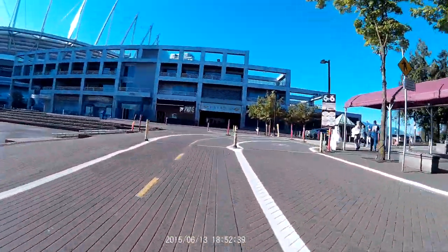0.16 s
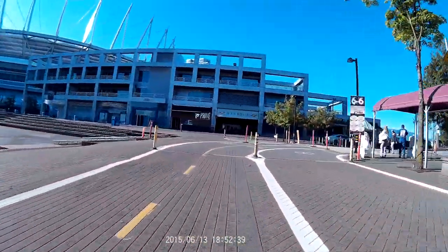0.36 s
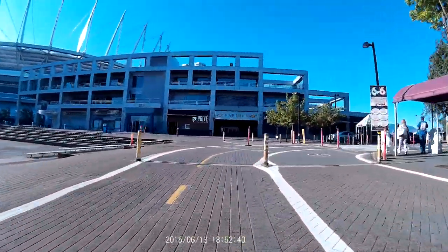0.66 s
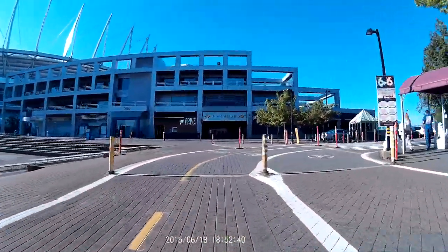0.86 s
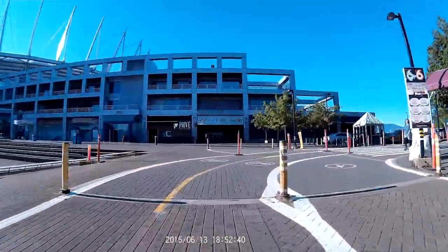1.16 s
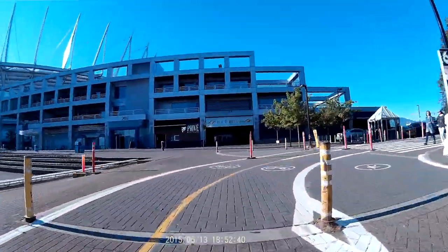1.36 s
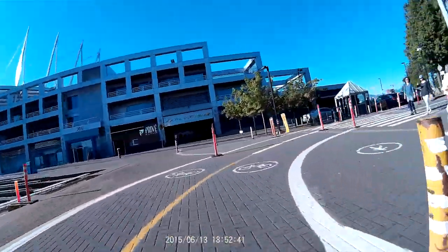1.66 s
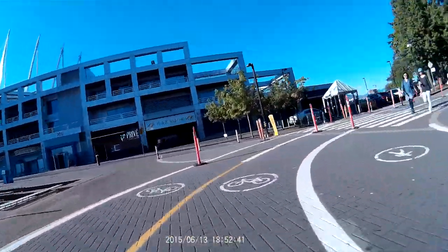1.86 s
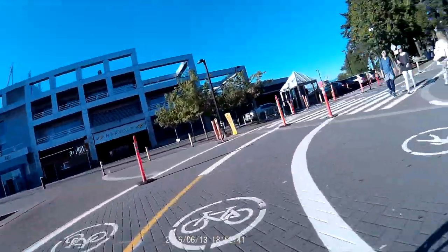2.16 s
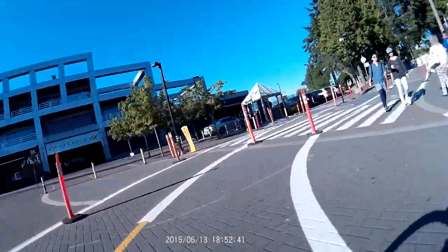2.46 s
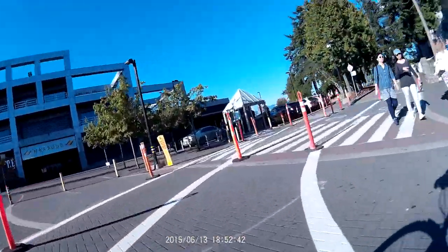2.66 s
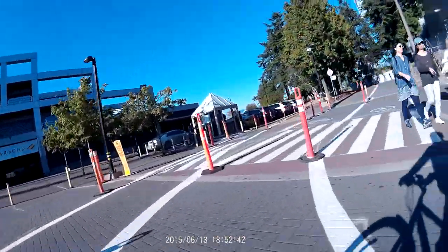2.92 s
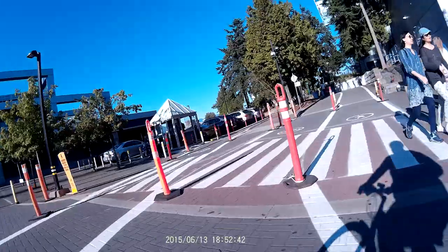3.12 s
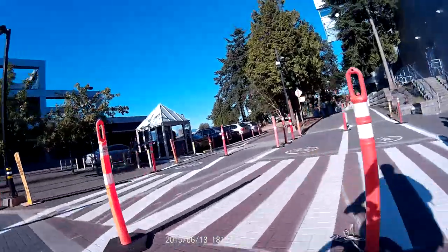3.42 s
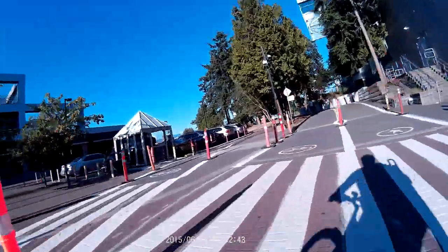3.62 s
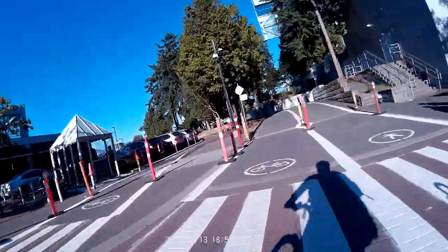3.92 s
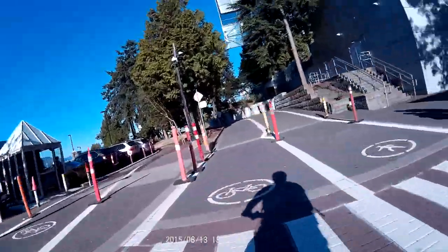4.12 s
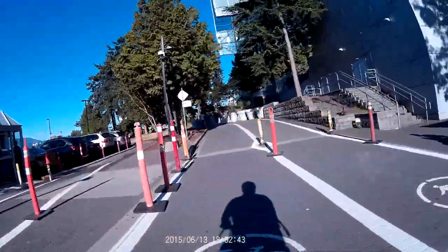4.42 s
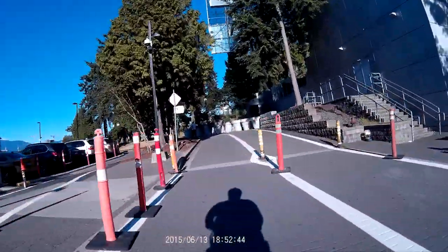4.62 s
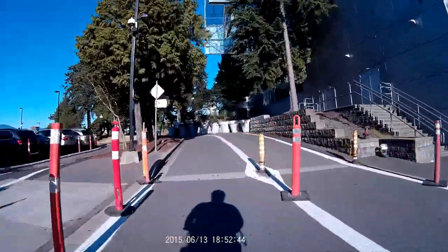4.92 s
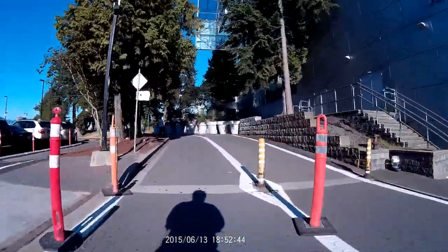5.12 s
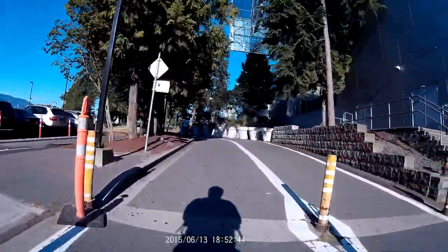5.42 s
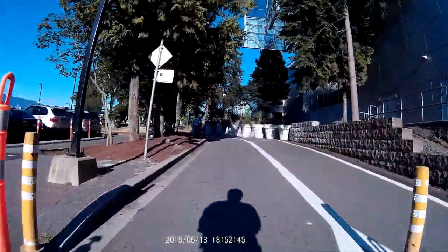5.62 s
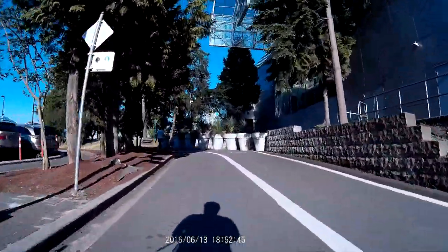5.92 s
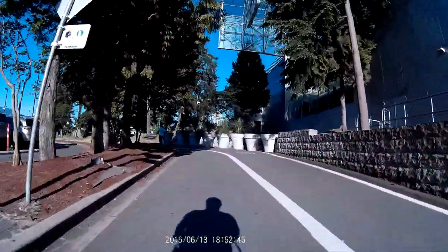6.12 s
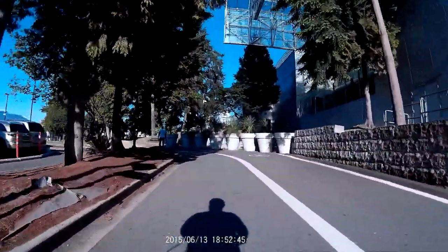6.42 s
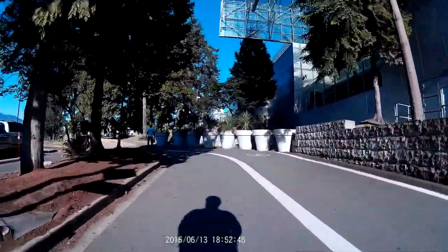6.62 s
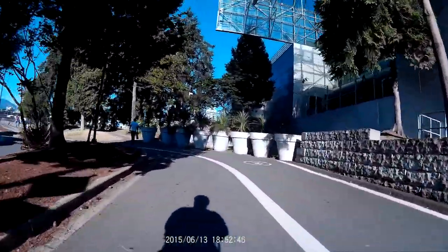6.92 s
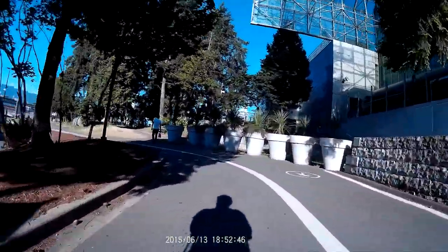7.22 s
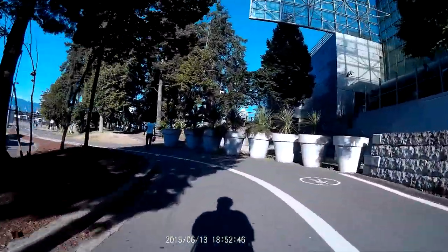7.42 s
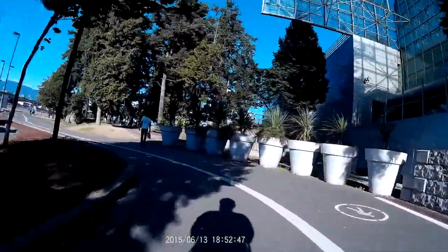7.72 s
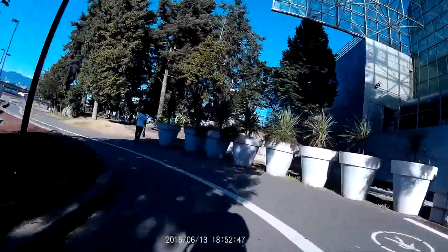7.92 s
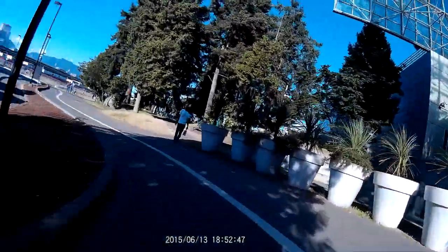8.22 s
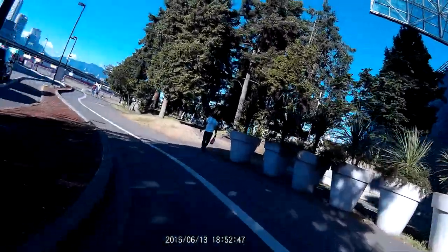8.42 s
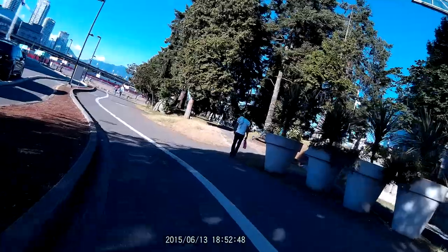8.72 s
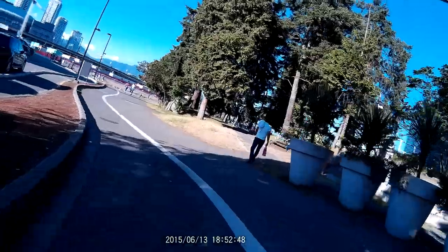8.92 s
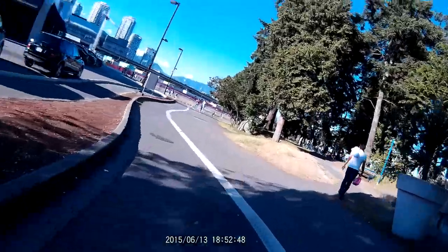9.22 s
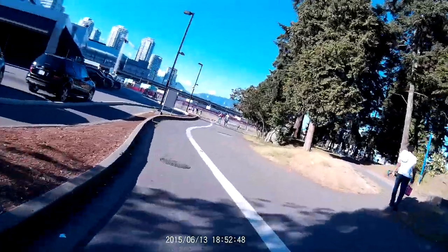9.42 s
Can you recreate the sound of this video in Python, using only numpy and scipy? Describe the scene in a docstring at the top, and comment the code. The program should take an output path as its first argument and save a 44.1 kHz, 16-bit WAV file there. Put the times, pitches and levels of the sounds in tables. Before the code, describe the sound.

A bicycle rolls over brick paving with a low buzzing hum and hard plastic rattles, then smooths out onto gritty asphalt.

```python
"""A bicycle ride, heard by a microphone in a loose plastic case on the handlebar.
From the start it rolls over brick pavers: shaped noise makes mount hum, tyre roar and rumble, louder on rough stretches.
Up to about 6 s, joints thud through the fork and the case chatters and knocks on its mount in decaying modes.
Smooth asphalt from 6.7 s brings less chatter, with grit, sandy patches and a few taps; a last jolt and knock come near 9.5 s.
Gain control ducks the sound after sharp knocks; the highest peaks clip."""
import sys
import numpy as np
from scipy import signal
from scipy.fft import rfft, irfft
from scipy.io import wavfile
from scipy.ndimage import uniform_filter1d

SR = 44100
rng = np.random.default_rng(int(sys.argv[2]) if len(sys.argv) > 2 else 0)


def inscribe(sig):
    """Save sig as 16-bit PCM at rate SR to the path in sys.argv[1].

    A 1-D sig is mono; a 2-D sig holds one channel per row.
    Samples are clipped to [-1, 1] before scaling.
    """
    pcm = np.round(np.clip(np.atleast_2d(sig).T, -1, 1) * 32767)
    wavfile.write(sys.argv[1], SR, pcm.astype(np.int16))


N = 422037
TIME_S = np.arange(N) / SR

# All table levels are relative: each source adds its own trim.
# ride apart from bumps: (time [s], mount hum [dB], tyre roar [dB], rumble [dB])
RIDE_LEVELS = [(0, -26.5, -47, -37.5), (.3, -18, -40, -30.5), (.8, -14.5, -36, -30),
               (1.15, -20, -41.5, -31.5), (1.35, -16.5, -36, -30.5), (2.3, -20, -40, -33),
               (2.9, -17.5, -36.5, -25), (3.2, -19.5, -35, -27), (4, -17, -38.5, -28),
               (4.7, -19, -39.5, -27), (5.2, -18, -38.5, -31.5), (5.7, -15, -35.5, -24.5),
               (6.25, -23.5, -41, -33), (6.5, -15.5, -36.5, -33), (7.25, -22.5, -34.5, -35.5),
               (7.6, -18, -34, -36), (8.5, -18.5, -37, -34.5), (9.57, -17, -34.5, -32)]
# rough paving: (start [s], length [s], roughness [dB])
ROUGH_STRETCHES = [(.44, 0.21, -7), (.76, 0.11, -12), (.96, 0.076, -3.5), (1.23, 0.049, -13),
                   (1.755, .11, 2), (1.945, 0.071, 11.5), (2.47, 0.044, -2.5), (2.61, 0.16, -10.5),
                   (3.24, 0.11, -2), (3.49, 0.19, 6), (3.95, 0.31, -7.5), (4.35, 0.25, -7),
                   (4.79, 0.028, -4.5), (4.97, 0.19, -22), (5.22, 0.052, -5.5), (5.4, 0.16, 0),
                   (5.81, 0.21, -2), (9.48, 0.012, -12)]
# brief swells and dips of the mount's hum and the rumble: (centre [s], level change [dB])
HUM_SWELLS = [(2.22, 5), (2.5, 4.5), (3.6, 3), (4.82, 2), (6.5, -0.5), (6.76, -3), (7.05, 2.5), (7.6, 4.5),
              (7.88, 2), (8.88, 3), (9.5, -2)]
# sandy patches: (start [s], length [s], level [dB])
SAND_PATCHES = [(4.35, 0.92, -54), (6.76, 0.14, -54), (7.2, 0.17, -59), (7.52, .3, -50), (9.22, 0.095, -45)]
# grit breaking under the tyre: (time [s], level [dB])
GRIT_TIMES = [(1.178, -40.5), (6.278, -50), (6.302, -37.5), (6.771, -38), (6.8578, -47), (7.231, -43),
              (8.0088, -41.5), (9.3338, -44)]
# wheel drops into a joint: (time [s], thud [dB], handlebar lurch [dB])
JOINT_DROPS = [(1.759, -25.5, -17), (1.79, -22, -16), (1.98, -7, 2), (2.631, -16, -7.5), (3.025, -1, 3.5),
               (3.499, -21, -15), (3.615, -12, -7.5), (3.635, -13.5, -5), (3.656, -10, 1),
               (4.036, -24, -14), (4.161, -19.5, -18), (4.461, -16.5, -26), (4.48, -9, 1), (4.521, -15, -8),
               (4.648, -15, -13.5), (5.489, -21, -23), (5.82, -28, -3), (5.918, -9, 0), (5.938, -1.5, 9),
               (6.041, -14, -1.5), (9.496, -29, -7.5)]
# lone light taps of the case: (time [s], level [dB])
LIGHT_TAPS = [(0.3685, -33.5), (0.4541, -20.5), (0.4862, -22.5), (0.5151, -22), (0.5541, -26),
              (2.6212, -21), (2.6877, -23), (3.3371, -21), (3.416, -24), (3.548, -14), (4.1277, -19),
              (3.843, -23.5), (3.957, -24.5), (4.8069, -21), (4.9187, -32), (5.0005, -24), (5.1033, -26),
              (5.2378, -29), (5.5526, -22), (5.869, -20), (6.0219, -18), (7.5765, -31), (8.01, -33)]
# case knocks on the mount: (time [s], knock [dB], mount swing [dB], blows in a row [count])
CASE_KNOCKS = [(0.0527, -22.5, -21, 1), (0.4937, -26.5, -10, 1), (0.837, -7.5, -30, 5),
               (0.871, -18, -10, 1), (1.08, -16, -8, 1), (1.3783, -14, -10, 1), (1.7776, -15.5, -1.5, 1),
               (1.7999, -15, -8, 1), (1.8286, -4.5, -1.5, 1), (1.8564, -2.5, -2.5, 2),
               (1.9625, -13, -16, 1), (1.986, -2, -8, 5), (2.023, -9, -11, 2), (2.1371, -13, -7, 1),
               (2.37, -21, -16, 1), (2.636, -2, -3, 2), (2.7844, -5, -8, 1), (2.8384, -11.5, -3, 1),
               (2.8635, -10.5, -3, 1), (3.0252, -3, 3, 2), (3.0326, 2.5, -4, 8), (3.074, -8, -9, 2),
               (3.2366, -14.5, -5, 1), (3.2507, -20, -25, 1), (3.3468, -18, -16, 1), (3.3522, -12, -6, 1),
               (3.4956, -14.5, -16, 1), (3.523, -5.5, -4, 1), (3.57, -16.5, -16, 1),
               (3.6191, -0.5, -4.5, 3), (3.6435, -4.5, -11, 1), (3.6578, -2.5, 6, 3), (3.723, -9, -6.5, 1),
               (4.0384, -8.5, -4, 3), (4.0652, -21, -25, 2), (4.1698, -7, -6.5, 2), (4.4652, -10, -0.5, 1),
               (4.4837, -4, -14, 4), (4.5214, -1.5, -4, 2), (4.5727, -20, -19, 1), (4.626, -11, -8, 2),
               (4.6525, -7, -10, 3), (5.4894, -9.5, -14, 1), (5.4946, -4, -3, 1), (5.8953, -20.5, -15, 2),
               (5.9086, -6, -22, 2), (5.9236, -7, -13, 1), (5.943, -8, 2, 1), (5.948, -0.5, -9, 5),
               (6.0013, -6.5, -6, 1), (6.0423, -6.5, -13, 3), (6.0792, -6, -5.5, 1), (6.096, -18, -11, 1),
               (9.4985, -18, 0.5, 1)]

# microphone hiss: (frequency [Hz], density [dB per Hz])
HISS_SPECTRUM = [(1000, 10.5), (6000, -4.5), (9000, -2.5), (14500, -2.5), (15400, -14), (16500, -21.5)]
# rumble through the frame: (frequency [Hz], density [dB per Hz])
RUMBLE_SPECTRUM = [(10, -4.5), (27, -4), (45, -4.5), (70, -9.5), (115, -6.5), (160, -17), (230, -13),
                   (400, -34), (1200, -76)]
# tyre roar inside the case: (frequency [Hz], density [dB per Hz])
ROAR_SPECTRUM = [(120, -19.5), (200, 3.5), (430, 12.5), (530, -4), (660, 3.5), (920, 0), (1250, -2),
                 (1450, -4.5), (1800, -9.5), (2200, -12), (3000, -18), (3200, -41), (4200, -32.5),
                 (6500, -39)]
# case resonances colouring the roar: (frequency [Hz], full width at half the dB lift [Hz], lift [dB])
CASE_RESONANCES = [(1093.5, 140, 11.5), (1671, 140, 10.5), (2847, 120, 10.5), (3516, 370, 19.5),
                   (5300, 100, 8.5), (7700, 410, 6.5)]
# mount resonances: (frequency [Hz], half width [Hz], level [dB])
MOUNT_RESONANCES = [(304, 17, -4), (320.2, 33.5, 13), (457, 21, -9.5), (310, 180, -21)]
# joint thud through the frame: (frequency [Hz], density [dB per Hz])
THUD_SPECTRUM = [(40, -5.5), (130, -16), (240, 10), (330, -1), (480, 8.5), (620, -8), (800, -8.5),
                 (1050, -9), (1350, -11.5), (1650, 0.5), (2300, -16), (5000, -39.5)]
# modes of breaking grit: (frequency [Hz], level [dB], t60 [s])
GRIT_RING = [(1130, 3.5, 0.033), (1670, 16, 0.018), (2750, 7.5, 0.031), (3660, -2, 0.026),
             (4220, -4, 0.033), (4900, -7, 0.0061), (5300, -6.5, .018), (6400, -12.5, .008),
             (7700, -12.5, 0.017)]
# modes of light chatter, before the extra damping of a click: (frequency [Hz], level [dB], t60 [s])
CHATTER_RING = [(1647, 6.5, 0.022), (1910, -9.5, 0.029), (2240, -13, 0.011), (2473, -13, 0.059),
                (2874, -14, 0.083), (3540, -14.5, 0.028), (3910, -8.5, 0.008), (5400, -20, 0.0074),
                (7100, -26.5, .01), (7750, -20.5, 0.0073), (8700, -33, .008), (11500, -22.5, 0.0076),
                (13700, -29.5, .011)]
# modes of a knock: (frequency [Hz], level [dB], t60 [s])
KNOCK_RING = [(998, -10, 0.028), (1705, -8, 0.016), (2174, -7, 0.0053), (2437, -1, 0.012),
              (2635, 6.5, 0.011), (2830, 2, 0.011), (3580, -9.5, 0.0062), (3570, -8, 0.013),
              (4345, -20, 0.027), (5360, -25.5, 0.024), (5620, -34.5, 0.0057), (6300, -30, 0.012),
              (7020, -21, 0.005), (7700, -37.5, 0.015), (9200, -27.5, 0.008), (11000, -29, 0.011),
              (13100, -23, 0.0085)]

SWING_HZ = 314.4  # swing of the mount
BAND_LIMIT_HZ = 15900
EDGE_S = 0.056  # ramp onto or off a stretch; shorter stretches stay below full level
SWELL_S = 0.051  # from the centre of a swell or dip to 1/e of its level change
HUM_LIFT, ROAR_LIFT, RUMBLE_LIFT = 0.21, .6, 0.75  # added share of gain at a roughness of 0 dB
JOINTED_DB, ASPHALT_DB, ASPHALT_FROM_S = -22, -33.5, 6.7  # base roughness before and on smooth asphalt
DUST_DB = -74.5  # thin sand everywhere, before the sand trim


def gain_of(db):
    """Decibels to gain."""
    return 10 ** (np.asarray(db) / 20)


def evened(x):
    """Scaled to rms 1."""
    return x / np.sqrt(np.mean(x ** 2) + 1e-20)


def curve(rows, column):
    """One column of a time table, at every sample."""
    rows = np.array(rows)
    return np.interp(TIME_S, rows[:, 0], rows[:, column])


def read(points, hz):
    """A spectrum, joined by lines on a log-frequency axis."""
    point_hz, db = np.transpose(points)
    return np.interp(np.log(hz + 1), np.log(point_hz + 1), db)


def add(mix, time_s, sound):
    """Mixes a sound in at the given time."""
    part = mix[max(round(time_s * SR), 0):][:len(sound)]
    part += sound[:len(part)]


def noise(db_at, size=N):
    """Noise of rms 1 whose spectrum is the function db_at(Hz)."""
    spectrum = rfft(rng.standard_normal(size))
    shape = gain_of(db_at(np.fft.rfftfreq(size, 1 / SR)))
    return evened(irfft(spectrum * shape, size))


def wander(hz):
    """Slow random drift of rms 1, falling off above the given rate."""
    return noise(lambda f: -20 * np.log10(1 + (f / hz) ** 4))


def steadied(x, window_s):
    """Evens out swells longer than the window and keeps the quick beating."""
    size = int(window_s * SR)
    power = uniform_filter1d(uniform_filter1d(x ** 2, size), size)
    return x / np.sqrt(abs(power) + 1e-9)


def stretches(rows):
    """Gain over time as the tyre runs onto each stretch, crosses it and leaves it."""
    total = 0
    for start_s, length_s, db in rows:
        inside_s = np.minimum(TIME_S - start_s, start_s + length_s - TIME_S)
        total = total + gain_of(db) * np.clip(.5 + inside_s / EDGE_S, 0, 1)
    return total


def shaken(lift, settle_s=0.017):
    """Gain raised by rough paving, smoothed because the frame takes a moment to settle."""
    return 1 + lift * uniform_filter1d(stretches(ROUGH_STRETCHES), int(settle_s * SR))


def swelling_db():
    """Level change over time: the brief swells and dips of hum and rumble, summed."""
    return sum(db * np.exp(-((TIME_S - centre_s) / SWELL_S) ** 2) for centre_s, db in HUM_SWELLS)


def ring(modes, scatter_db, detune, rise_s, fuzz_db, size=1400):
    """One strike: modes decay at their own rates over a brief noise fuzz, standing for many weak modes."""
    hz, db, t60_s = np.transpose(modes)[:, :, None]
    t = np.arange(size) / SR
    louder, higher, phase = rng.standard_normal((3, len(hz), 1))  # each strike made here lands elsewhere
    share = gain_of(db + scatter_db * louder)
    # scatter shares the strength out differently but keeps its total
    share = share * np.linalg.norm(gain_of(db)) / np.linalg.norm(share)
    decay = np.exp(-np.log(1000) * t / t60_s)
    tones = share * decay * np.sin(2 * np.pi * (hz * (1 + detune * higher) * t + phase))
    dull_noise = signal.lfilter([1], [1, -.7], rng.standard_normal(size))
    fuzz = gain_of(fuzz_db) * dull_noise * np.exp(-t / .003)
    return (tones.sum(0) + fuzz) * (1 - np.exp(-t / rise_s))


def patter(strike, per_s, spread_db, count=80):
    """Strikes at random moments, of uneven strength, drawn from a stock, at an even mean level."""
    kinds, out = [strike() for _ in range(count)], np.zeros(N)
    for place, chance, kind in rng.random((int(per_s * N / SR), 3)):
        strength = gain_of(-spread_db * np.log(chance + 0.088))
        add(out, place * N / SR, strength * kinds[int(kind * count)])
    return steadied(out, window_s=0.12)


def hiss(level_db=-61):
    """Steady microphone hiss: shaped noise."""
    return gain_of(level_db) * noise(lambda f: read(HISS_SPECTRUM, f))


def rumble(trim_db=0):
    """Slow shaking of the frame and air buffeting the case."""
    shake = steadied(noise(lambda f: read(RUMBLE_SPECTRUM, f)), window_s=0.042)
    level_db = curve(RIDE_LEVELS, 3) + swelling_db() + trim_db
    return shake * gain_of(level_db) * shaken(RUMBLE_LIFT)


def tyres(trim_db=2.5, lumpy_db=2.0):
    """Tread on pavement: an uneven roar, coloured by the hollow case."""
    def response_db(f):
        lift_db = sum(db / (1 + (2 * (f - hz) / width) ** 2) for hz, width, db in CASE_RESONANCES)
        return read(ROAR_SPECTRUM, f) + lift_db - 20 * np.log10(1 + (f / 9000) ** 4)
    roar = noise(response_db)
    level_db = curve(RIDE_LEVELS, 2) + trim_db + lumpy_db * wander(hz=44.8)
    return roar * gain_of(level_db) * shaken(ROAR_LIFT)


def hum(trim_db=-2.5):
    """The road's grain shakes the springy mount, which rings at its own pitch."""
    def response_db(f):
        power = sum(gain_of(db) ** 2 / (1 + ((f - hz) / width) ** 2) ** 2
                    for hz, width, db in MOUNT_RESONANCES)
        low_cut = f ** 4 / (f ** 4 + 230 ** 4)
        return 10 * np.log10(power * low_cut + 1e-14)
    level_db = curve(RIDE_LEVELS, 1) + swelling_db() + trim_db
    return steadied(noise(response_db), window_s=0.28) * gain_of(level_db) * shaken(HUM_LIFT)


def snap():
    """One grain breaking under the tyre: a short ring of the grit modes."""
    return ring(GRIT_RING, scatter_db=3.0, detune=0.046, rise_s=0.00074, fuzz_db=-20.5)


def sand(trim_db=2):
    """Many tiny grains crunch under the tread."""
    crunch = patter(snap, per_s=1300, spread_db=5.0, count=160)
    return crunch * (stretches(SAND_PATCHES) + gain_of(DUST_DB)) * gain_of(trim_db)


def grit(trim_db=-1, crumble_s=0.009, fade_db=5, count=3):
    """A larger grain breaks under the tyre in a few snaps, each given a lower level."""
    out = np.zeros(N)
    for time_s, db in GRIT_TIMES:
        for k in range(count):
            later_s = crumble_s * rng.random() * k
            add(out, time_s + later_s, gain_of(db + trim_db - fade_db * k) * snap())
    return out


def jolts(thud_trim_db=7, lurch_trim_db=0, rise_s=0.0022, lurch_s=0.0032, lurch_hz=225, size=3000):
    """Joints in the paving send a dull thud up the fork, and the handlebar lurches for a few swings."""
    out, t = np.zeros(N), np.arange(size) / SR
    thud_shape = t / rise_s * np.exp(1 - t / rise_s)
    lurch_shape = t / lurch_s * np.exp(1 - t / lurch_s)
    for time_s, thud_db, lurch_db in JOINT_DROPS:
        shake = steadied(noise(lambda f: read(THUD_SPECTRUM, f), size=size), window_s=0.0058)
        lurch = np.sin(2 * np.pi * lurch_hz * (1 + 0.16 * rng.standard_normal()) * t)
        add(out, time_s - .001, gain_of(thud_db + thud_trim_db) * shake * thud_shape)
        add(out, time_s - .001, gain_of(lurch_db + lurch_trim_db) * lurch * lurch_shape)
    return out


def tap():
    """One soft touch of the case on the mount: slow onset."""
    return ring(CHATTER_RING, scatter_db=2.0, detune=0.012, rise_s=0.0028, fuzz_db=-29.5)


def click(damp_s=0.016):
    """One crisp touch of the case, damped as it stays against the mount."""
    sound = ring(CHATTER_RING, scatter_db=2.5, detune=.007, rise_s=0.00012, fuzz_db=-25)
    return sound * np.exp(-np.arange(len(sound)) / SR / damp_s)


def chatter(pat_db=-30, click_db=-36, click_power=0.65, clicks_per_s=70, clump_db=2,
            tap_trim_db=-1, bounce_s=0.0042, bounce_db=-10, swing_db=8, swing_s=0.0064, count=2):
    """The loose case patters and clicks with roughness; lone taps ride a swell of the mount's hum."""
    base_db = np.where(TIME_S < ASPHALT_FROM_S, JOINTED_DB, ASPHALT_DB)
    roughness = stretches(ROUGH_STRETCHES) + gain_of(base_db)
    pats = gain_of(pat_db) * roughness * patter(tap, per_s=170, spread_db=11.5)
    # power below 1: even slight shaking clicks
    clicks = gain_of(click_db) * roughness ** click_power * patter(click, clicks_per_s, spread_db=4.5)
    out = (pats + clicks) * gain_of(clump_db * wander(hz=22))  # touches come in clumps
    t = np.arange(-1100, 1100) / SR
    swing = np.exp(-(t / swing_s) ** 2) * np.cos(2 * np.pi * SWING_HZ * t)
    for time_s, db in LIGHT_TAPS:
        add(out, time_s + t[0], gain_of(db + swing_db) * swing)
        for k in range(count):
            later_s = k * bounce_s * (.5 + rng.random())
            add(out, time_s + later_s, gain_of(db + tap_trim_db + bounce_db * k) * click())
    return out


def knocks(knock_trim_db=0, swing_trim_db=-1, fade_db=1.5, build_s=0.0017, settle_s=0.0051,
           graze_db=-19, graze_rise_db=9, bounce_db=-14, bounce_fade_db=5):
    """The mount swings wide; the case strikes near each crest: two grazes, the blows, three soft bounces."""
    out = np.zeros(N)
    t = np.arange(-600, 1800) / SR
    for time_s, db, wide_db, strikes in CASE_KNOCKS:
        count = max(round(strikes), 1)
        after_s = np.maximum(t - (count - 1) / SWING_HZ, 0)  # settles after the last blow
        width = np.where(t < 0, np.exp(-(t / build_s) ** 2), np.exp(-after_s / settle_s))
        swing = width * np.cos(2 * np.pi * SWING_HZ * t)
        add(out, time_s + t[0], gain_of(wide_db + swing_trim_db) * swing)
        for k in range(-2, count + 3):
            if k < 0:
                soft_db = graze_db + graze_rise_db * (k + 1)
            elif k >= count:
                soft_db = bounce_db - bounce_fade_db * (k - count)
            else:
                soft_db = 0
            # blows keep time with the swing; grazes and bounces stray
            stray_swings = .25 if soft_db else .04
            offset_s = (k + stray_swings * rng.standard_normal()) / SWING_HZ
            blow = ring(KNOCK_RING, scatter_db=3.14, detune=0.0063, rise_s=0.00015, fuzz_db=-31)
            add(out, time_s + offset_s, gain_of(db + knock_trim_db - fade_db * k + soft_db) * blow)
    return out


def scene():
    """All sources summed at the microphone, as one channel."""
    road = hiss() + rumble() + tyres() + hum() + sand() + grit()
    return (road + jolts() + chatter() + knocks())[None]


def record(dry, threshold_db=-14, sensed_fall_db_per_s=50, share=0.43, ceiling=0.63,
           attack_s=0.0064, sense_hz=900):
    """Gain control turns down after sharp knocks and creeps back; peaks clip flat; then the band limit."""
    treble = signal.butter(2, sense_hz, "high", fs=SR, output="sos")
    peak_db = 20 * np.log10(abs(signal.sosfilt(treble, dry[0])) + 1e-9)
    fall_db = TIME_S * sensed_fall_db_per_s
    held_db = np.maximum.accumulate(peak_db + fall_db) - fall_db
    over_db = np.maximum(held_db - threshold_db, 0)
    lag = np.exp(-1 / (attack_s * SR))
    cut_db = share * signal.lfilter([1 - lag], [1, -lag], over_db)  # only a share of the excess is cut
    ducked = dry / gain_of(cut_db)
    clipped = ducked / (1 + (ducked / ceiling) ** 12) ** (1 / 12)
    low_pass = signal.firwin(255, BAND_LIMIT_HZ, window=("kaiser", 9), fs=SR)
    return signal.oaconvolve(clipped, low_pass[None], "same")


dry = scene()
out = record(dry)
inscribe(out)
```